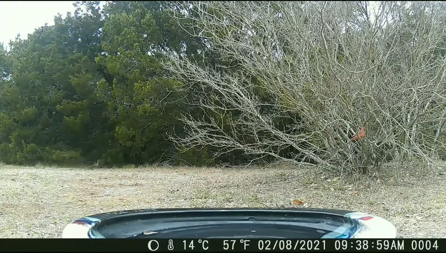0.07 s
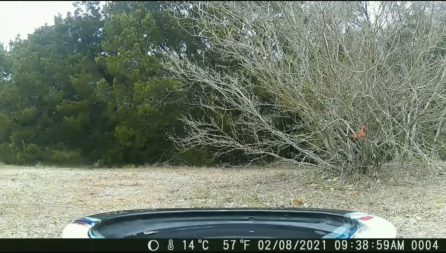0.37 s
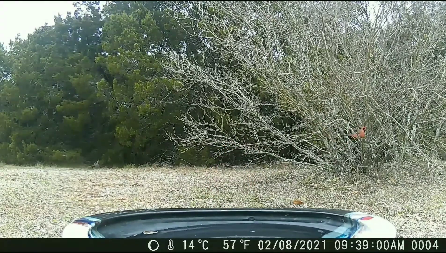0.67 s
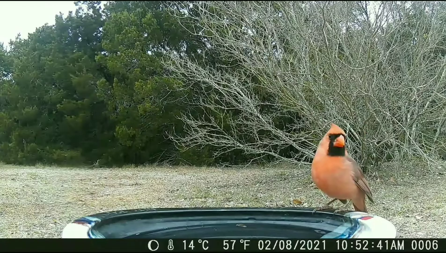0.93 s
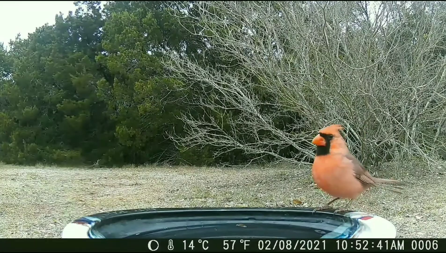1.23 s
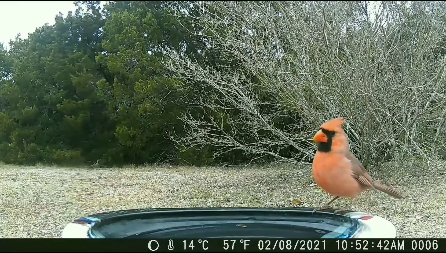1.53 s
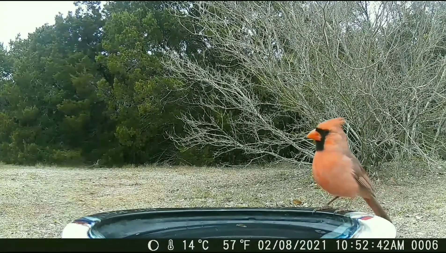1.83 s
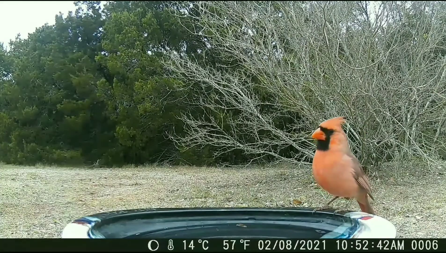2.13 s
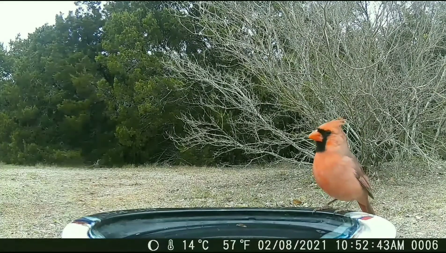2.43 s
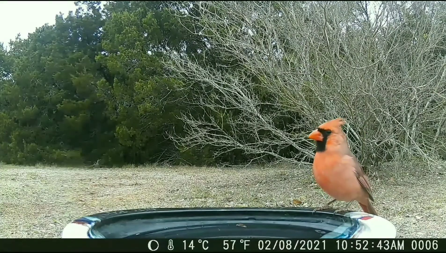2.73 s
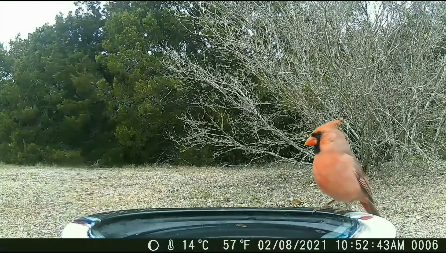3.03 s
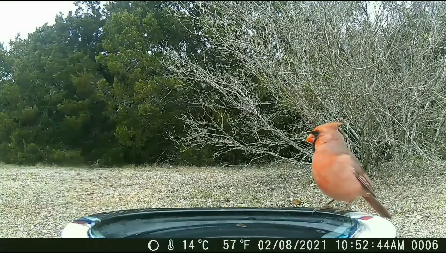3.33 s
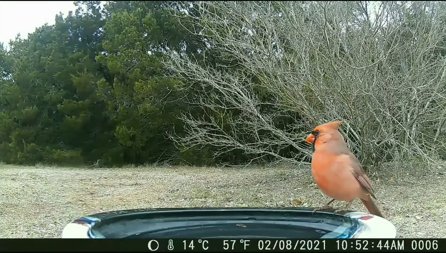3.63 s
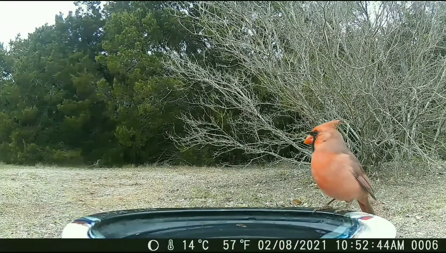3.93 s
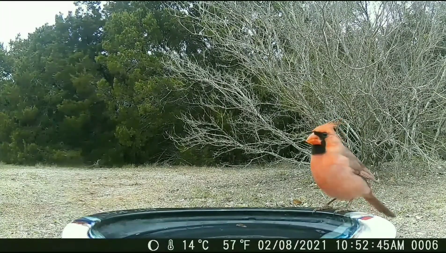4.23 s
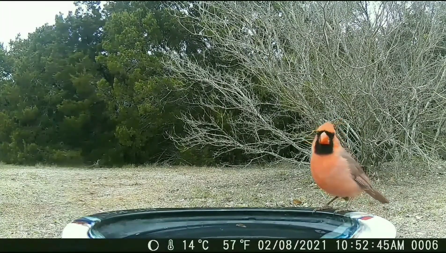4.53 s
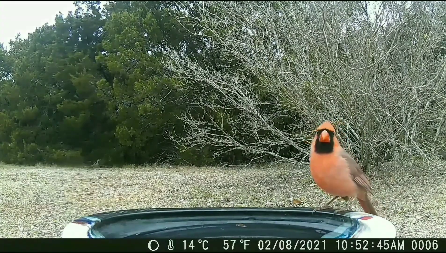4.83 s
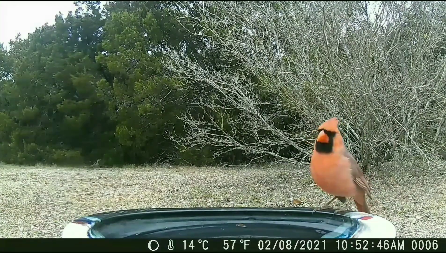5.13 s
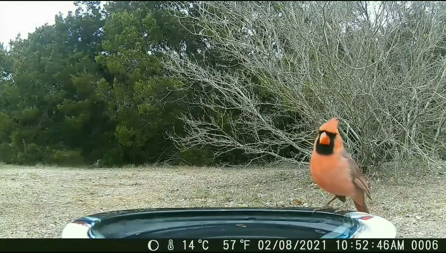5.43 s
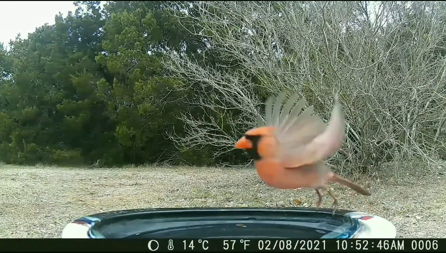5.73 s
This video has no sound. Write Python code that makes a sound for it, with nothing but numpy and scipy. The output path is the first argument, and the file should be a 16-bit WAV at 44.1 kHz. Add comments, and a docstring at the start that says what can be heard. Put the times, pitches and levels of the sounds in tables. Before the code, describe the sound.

A songbird whistles a run of seven upward-sweeping notes across a garden, with a few high chips near the microphone and light ticks on a hollow bird bath. Once the song stops, faint chirps and scratchy calls carry from the bushes, ending in a buzzy rising call and a faint thin whine. Soft wind and distant engines rumble underneath, and the small, slightly muffled microphone adds three electrical clicks.

```python
"""On a lawn, heard by a small camera on a bird bath, a cardinal sings seven rising whistles. Each is a gliding
tone, reflected by the ground and scattered by trees. Thin chips sound close by, other birds twitter in the
hedge, and light contacts excite the bath's damped resonances. Far engines drone in harmonics under soft wind,
and a thin whine swells at the end. The camera dulls the treble. The sound drops out briefly as the scene
changes, and three sharp clicks sound, one at the dropout."""
import sys
import numpy as np
from scipy import signal
from scipy.fft import rfft, irfft, next_fast_len
from scipy.io import wavfile
from scipy.ndimage import uniform_filter1d, map_coordinates

SR = 44100
rng = np.random.default_rng(int(sys.argv[2]) if len(sys.argv) > 2 else 0)


def generate_wav(sig):
    """Save sig (samples, or channels by samples) to the path in sys.argv[1] as 16-bit PCM at SR."""
    pcm = np.round(np.clip(np.atleast_2d(sig).T, -1, 1) * 32767).astype(np.int16)
    wavfile.write(sys.argv[1], SR, pcm)


N = 259749
TIME = np.arange(N) / SR

# one up-slurred whistle: (time from its knee [s], pitch [Hz], relative level [dB])
WHISTLE_CONTOUR = [(-.115, 1530, -23), (-.07, 1800, -18), (-.05, 1950, -14), (-.04, 2060, -4.5),
                   (-.02, 2280, -3), (-.002, 2460, -3), (.004, 2680, -1), (.01, 3130, 0), (.016, 3450, 0),
                   (.022, 3690, 0), (.027, 4000, -6), (.032, 4350, -22)]
# the cardinal's whistles: (time of the knee [s], level [dB], stretch of the slow rise [ratio])
WHISTLES = [(1.172, -61, 0.97), (1.498, -59, 0.98), (1.818, -60.5, 1.08), (2.132, -61, 1.0),
            (2.257, -61, .9), (2.570, -61, 0.95), (2.892, -62, 0.86)]
# the song's paths off the ground and nearby things: (delay [s], gain [dB])
REFLECTIONS = [(.00173, -15), (.01333, -5), (.01437, -10), (.01504, -12)]
# twigs scatter the high notes best: (frequency [Hz], gain [dB])
TWIG_SCATTER = [(1800, -1), (2900, -6), (3700, 2.5)]
# close chips: (time [s], length [s], first pitch [Hz], settled pitch [Hz], settling [s], base level [dB])
CHIPS = [(0.517, 0.024, 9360, 7630, 0.007, -58), (1.226, 0.029, 9870, 7670, 0.0088, -53),
         (2.836, 0.016, 9700, 8200, .005, -67.5), (3.362, .023, 9930, 8200, 0.0043, -43.5)]

# Each kind of hedge call has a shape, relative to its middle pitch, and a list of notes.
# shape: (first pitch [ratio], last pitch [ratio], rasp [ratio])
# notes: (time [s], length [s], middle pitch [Hz], level [dB])
SAG_SHAPE = (1.045, 0.93, .011)  # soft, low, drooping notes
SAG_NOTES = [(1.95, .045, 2130, -74), (3.182, 0.04, 1990, -72.5), (3.56, 0.036, 2080, -67),
             (3.634, .037, 1967, -68.5), (3.722, .042, 2100, -70), (3.795, 0.049, 2000, -73)]
FLICK_SHAPE = (.9, 1.075, .009)  # quick upward flicks
FLICK_NOTES = [(3.791, .055, 3090, -73.5), (5.146, .038, 3730, -65), (5.184, 0.025, 3640, -65.5),
               (5.548, 0.056, 3180, -75), (5.596, 0.034, 3835, -63)]
SCRATCH_SHAPE = (1.09, .93, .085)  # scratchy falling notes
SCRATCH_NOTES = [(3.446, 0.015, 3420, -69.5), (4.095, .042, 2600, -71), (4.123, .024, 3720, -68),
                 (4.14, 0.042, 3390, -71)]
ARCH_SHAPE = (.94, .81, 0.017)  # a run of arched chirps
ARCH_NOTES = [(4.749, 0.033, 2610, -70), (4.804, 0.036, 2644, -65.5), (4.867, 0.035, 2610, -67.5),
              (4.94, 0.035, 2460, -67)]
PIPE_SHAPE = (1.01, 0.97, .013)  # thin, almost level whistles
PIPE_NOTES = [(1.005, .05, 2056, -73.5), (2.638, .075, 2200, -71), (2.64, 0.047, 3690, -66.5),
              (3.125, 0.08, 3710, -77.5)]
HOARSE_SHAPE = (1.025, 1, .04)  # high, hoarse notes that sink a little
HOARSE_NOTES = [(3.459, .028, 3134, -64), (5.272, 0.057, 4320, -68), (5.32, .16, 4270, -72),
                (5.515, .03, 3480, -77), (5.627, .058, 3950, -68.5)]
# a long buzzy rising call: (time [s], pitch [Hz], level [dB])
LONG_CALL = [(5.70, 2050, -84), (5.765, 2330, -79), (5.799, 2850, -69.5), (5.823, 3000, -65),
             (5.843, 3234, -64), (5.89, 3380, -64.5)]

# light contacts on the bath: (time [s], level [dB], resonance [Hz])
BATH_TICKS = [(.05, -59.5, 2820), (.092, -61, 3050), (.161, -56.5, 990), (.172, -61, 1600),
              (.2502, -53, 1628), (.286, -55, 2870), (.294, -54.5, 2200), (.46, -54, 1048),
              (.47, -61, 3827), (.547, -52.5, 1330), (3.677, -55.5, 1998), (3.838, -66, 3400),
              (3.878, -61, 3300)]
# heavier contacts knock the hollow bowl: (time [s], level [dB], resonance [Hz])
BOWL_KNOCKS = [(.163, -51.5, 334), (.252, -57, 382), (.286, -49.5, 337), (1.474, -55.5, 420),
               (3.674, -52, 486)]

# harmonics of four far engines: (multiple of the base rate [ratio], level [dB])
MOTOR_PARTIALS = [(2, -65), (3, -76), (4, -78), (5, -75), (6, -77), (7, -85.5)]
THROB_PARTIALS = [(1, -50.5), (2, -53.5)]
SLOWING_PARTIALS = [(1, -50), (2, -61.5), (8, -79.5)]
IDLE_PARTIALS = [(1, -52.5), (2, -69), (6, -80)]
# the slowing engine's speed: (time [s], firing rate [Hz])
FIRING_RATE = [(1.0, 63), (2.5, 62), (3.5, 58.8), (4.4, 57.4), (5.89, 56.3)]
# the swell of its drone: (time [s], level [dB])
DRONE_LEVEL = [(1.0, -73), (3.0, -68.5), (3.8, -59.5), (4.5, -58.5), (5.1, -70.5), (5.89, -65.5)]
# the swell of the whine: (time [s], level [dB])
WHINE_LEVEL = [(5.15, -100), (5.32, -80.5), (5.5, -79), (5.63, -73.5), (5.89, -72)]

# puffs of wind on the microphone: (time of the peak [s], relative level [dB], half-width [s])
GUSTS = [(.2, -43.5, 0.15), (.37, -33.5, 0.035), (.48, -33.5, 0.051), (1.08, -37, 0.026),
         (1.181, -36, 0.018), (2.17, -37.5, 0.027), (4.115, -31, 0.048), (4.25, -35.5, 0.056),
         (4.49, -32, 0.081), (5.35, -40, 0.051), (5.56, -37, 0.042), (5.88, -36, 0.041)]
# spectrum of the eddies: (frequency [Hz], relative level [dB])
EDDY_SPECTRUM = [(10, 2), (25, 2), (38, 0.5), (55, -11.5), (110, -17), (250, -36), (800, -80)]
# outdoor air before and after the dropout: (frequency [Hz], spectral density [dB per Hz])
EARLY_AIR = [(15, -65), (60, -62), (110, -72.5), (200, -82), (300, -90), (500, -94.5), (800, -99),
             (1200, -101), (2000, -102), (3500, -105), (5000, -110), (8000, -113)]
LATE_AIR = [(15, -71), (60, -67), (110, -72), (160, -78), (300, -87.5), (450, -91.5), (800, -100),
            (1200, -104.5), (2000, -108), (3000, -112), (5000, -112), (8000, -114)]
# rise and fall of the air's treble: (time [s], gain [dB])
HISS_GAIN = [(0, 3), (.6, -1.5), (.95, -2.2), (1.2, 1.5), (2.9, .5), (3.9, 0), (4.6, -2), (5.1, 0),
             (5.89, 0)]

# the camera's response: (frequency [Hz], gain [dB])
CAMERA_RESPONSE = [(3550, -2), (3800, -10.5), (4000, -13.5), (4350, -20.5), (5500, -22), (6800, -16.5),
                   (7900, -16.5), (9200, -21), (10500, -26.5), (11800, -30), (12500, -25), (14000, -31.5),
                   (15400, -40), (15900, -61.5)]
# sharp clicks: (time [s], jump before smoothing [dB])
CLICKS = [(.961, -40.5), (2.218, -41), (5.0188, -36)]
CAMERA_RATE_HZ, CUTOFF_HZ = 16000, 15700
DROPOUT_START_S, DROPOUT_END_S = .961, 1.009


def cardinal(waver=0.0077, shimmer_db=1.0):
    """Frequency glide: each whistle swells on a slow rise, then whips upward, wavering at random."""
    out = np.zeros(N)
    from_knee, hz, db = np.transpose(WHISTLE_CONTOUR)
    for knee, level_db, stretch in WHISTLES:
        times = np.where(from_knee < 0, from_knee * stretch, from_knee)
        t = np.arange(times[0], times[-1], 1 / SR)
        pitch = np.interp(t, times, hz) * (1 + waver * drift(150, len(t)))
        loudness = level_db + np.interp(t, times, db) + shimmer_db * drift(120, len(t))
        add(out, knee + times[0], tone(pitch, loudness))
    return out


def chips(attack_s=0.0029, fade_db=22, accent_db=3.0):
    """Exponential relaxation: a chip starts abruptly and fades as its pitch settles downward."""
    out = np.zeros(N)
    for start, length, first_hz, settled_hz, settle_s, level_db in CHIPS:
        t = np.arange(0, length, 1 / SR)
        pitch = settled_hz + (first_hz - settled_hz) * np.exp(-t / settle_s)
        edges = np.clip(np.minimum(t, length - t) / attack_s, 0, 1)
        add(out, start, edges * tone(pitch, level_db + accent_db - fade_db * t / length))
    return out


def hedge_birds(rasp_hz=550, arch_power=.7):
    """Random frequency modulation: fast jitter widens short, curved glides into a rasp."""
    out = np.zeros(N)
    kinds = [(SAG_SHAPE, SAG_NOTES), (FLICK_SHAPE, FLICK_NOTES), (SCRATCH_SHAPE, SCRATCH_NOTES),
             (ARCH_SHAPE, ARCH_NOTES), (PIPE_SHAPE, PIPE_NOTES), (HOARSE_SHAPE, HOARSE_NOTES)]
    for (first, last, rasp), notes in kinds:
        bend = np.polyfit([0, .5, 1], [first, 1, last], 2)
        for start, length, hz, level_db in notes:
            t = np.arange(0, length, 1 / SR)
            glide = hz * np.polyval(bend, t / length)
            jitter = 1 + rasp * drift(rasp_hz, size=SR)[:len(t)]
            envelope = np.abs(np.sin(np.pi * t / length)) ** arch_power
            add(out, start, envelope * tone(glide * jitter, level_db))
    return out


def long_call(buzz_hz=165, depth=.07, jitter=.025):
    """Modulation sidebands: a fast, uneven vibrato makes a rising whistle buzz; one echo follows."""
    times, hz, db = np.transpose(LONG_CALL)
    vibrato = depth * np.sin(2 * np.pi * buzz_hz * TIME + drift(60)) + jitter * drift(400)
    pitch = np.interp(TIME, times, hz) * (1 + vibrato)
    call = tone(pitch, np.interp(TIME, times, db)) * (TIME > times[0])
    return call + echo(call, delay_s=.0085, level_db=-3.5)


def bird_bath(tick_decay_s=0.0038, tick_q=1.47, knock_decay_s=0.014, knock_q=2.5):
    """Damped resonance: each contact is a band of noise that dies away exponentially."""
    out, t = np.zeros(N), np.arange(SR // 10) / SR
    kinds = [(BATH_TICKS, tick_decay_s, tick_q), (BOWL_KNOCKS, knock_decay_s, knock_q)]
    for contacts, decay_s, q in kinds:
        fade = np.exp(-t / decay_s)
        for start, level_db, hz in contacts:
            b, a = signal.iirpeak(hz, q, fs=SR)
            noise = rng.standard_normal(2 * len(t))
            burst = fade * signal.lfilter(b, a, signal.lfilter(b, a, noise))[len(t):]
            add(out, start, from_db(level_db) * burst * np.linalg.norm(fade) / np.linalg.norm(burst))
    return out


def echo(x, delay_s, level_db):
    """Specular reflection: a longer path gives a delayed, weaker copy."""
    return from_db(level_db) * np.interp(TIME - delay_s, TIME, x, left=0)


def trees(x, level_db, t60=.55, edge_s=0.071, edge_width_s=0.02, edge_gain=1.1, far_db=-12, far_t60=1.6):
    """Diffuse scattering: branches give a tail, the wood's edge a swell, its depth a long faint ring."""
    t = np.arange(SR) / SR
    edge_swell = 1 + edge_gain * np.exp(-((t - edge_s) / edge_width_s) ** 2)
    near = from_db(-60 * t / t60) * edge_swell
    far = from_db(far_db - 60 * t / far_t60)
    tail = rng.standard_normal(SR) * np.hypot(near, far)
    return from_db(level_db) * signal.fftconvolve(x, tail / np.linalg.norm(tail))[:N]


def engine(hz, partials, wander, waver_db):
    """Periodic source: partials share one wandering rate, each wavering on its way through the air."""
    rate = hz * (1 + wander * drift(12))
    return sum(tone(multiple * rate, db + waver_db * drift(9)) for multiple, db in partials)


def early_engines(motor_hz=126.5, throb_hz=56.88):
    """Two harmonic series: a steady motor buzzes over a low throb."""
    motor = engine(motor_hz, MOTOR_PARTIALS, wander=.004, waver_db=2.1)
    throb = engine(throb_hz, THROB_PARTIALS, wander=.011, waver_db=3.0)
    return motor + throb


def late_engines(drone_ratio=3.6, idle_hz=86.52):
    """Pitch follows firing rate: one engine slows, its swelling drone in step, while another idles."""
    firing_hz = np.interp(TIME, *np.transpose(FIRING_RATE))
    drone_db = np.interp(TIME, *np.transpose(DRONE_LEVEL))
    slowing = engine(firing_hz, SLOWING_PARTIALS, wander=.014, waver_db=2.5)
    drone = engine(firing_hz, [(drone_ratio, drone_db)], wander=.006, waver_db=1.5)
    idling = engine(idle_hz, IDLE_PARTIALS, wander=.02, waver_db=3.5)
    return slowing + drone + idling


def whine(hz=1011.5, octave_db=-13):
    """Harmonic pair: a steady pitch and its faint octave swell together."""
    db = np.interp(TIME, *np.transpose(WHINE_LEVEL), left=-np.inf)
    pitch = np.full(N, hz)
    return tone(pitch, db) + tone(2 * pitch, db + octave_db)


def wind(gain_db=-1, steady_s=0.062, breeze_db=-56, restless_db=4):
    """Turbulence: eddies buffet the microphone in bell-shaped puffs over a restless breeze."""
    eddies = coloured(rng.standard_normal(N), EDDY_SPECTRUM)
    eddies /= np.sqrt(uniform_filter1d(eddies ** 2, int(steady_s * SR)))  # hold the rms near 1
    puffs = sum(from_db(db) * np.exp(-((TIME - peak) / width) ** 2) for peak, db, width in GUSTS)
    breeze = from_db(breeze_db + restless_db * drift(8))
    return eddies * from_db(gain_db) * np.hypot(puffs, breeze)


def air(spectrum, hiss_band_hz=(1900, 4500)):
    """Broadband noise: outdoor rumble and slowly varying hiss, below the camera's Nyquist limit."""
    white = rng.standard_normal(N) * np.sqrt(SR / 2)  # unit power per Hz
    camera_band = signal.butter(12, CAMERA_RATE_HZ / 2, fs=SR, output="sos")
    noise = signal.sosfilt(camera_band, coloured(white, spectrum))
    hiss = signal.sosfiltfilt(signal.butter(2, hiss_band_hz, "band", fs=SR, output="sos"), noise)
    hiss_gain = from_db(np.interp(TIME, *np.transpose(HISS_GAIN)))
    return noise + hiss * (hiss_gain - 1)


def clicks(relax_s=0.0017, edge_hz=7000):
    """Sharp clicks: the signal jumps and relaxes exponentially."""
    out, t = np.zeros(N), np.arange(SR // 20) / SR
    for start, jump_db in CLICKS:
        add(out, start, -from_db(jump_db) * np.exp(-t / relax_s))
    return signal.sosfilt(signal.butter(1, edge_hz, fs=SR, output="sos"), out + 1e-18)


def from_db(db):
    """Logarithmic level: 20 dB is a tenfold amplitude."""
    return 10 ** (np.asarray(db) / 20)


def coloured(x, spectrum):
    """Linear filtering: (frequency [Hz], gain [dB]) points, joined on a log axis, shape the spectrum."""
    hz, db = np.transpose(spectrum)
    size = next_fast_len(len(x) + SR // 10)
    bins = np.maximum(np.fft.rfftfreq(size, 1 / SR), 1)
    gain = from_db(np.interp(np.log(bins), np.log(hz), db))
    return irfft(rfft(x, size) * gain, size)[:len(x)]


def drift(rate, size=N):
    """Smooth random fluctuation of spread near 1, changing about rate times a second."""
    knots = rng.standard_normal(size // 10)
    return map_coordinates(knots, [TIME[:size] * rate], order=3, mode="wrap")


def tone(hz, db):
    """Phase is the integral of frequency: a sine follows a pitch curve at an rms level."""
    return np.sqrt(2) * from_db(db) * np.sin(2 * np.pi * np.cumsum(hz) / SR)


def add(out, start_s, sound):
    """Superposition: a sound joins the mix at its start time."""
    at = max(round(start_s * SR), 0)
    out[at:at + len(sound)] += sound[:max(N - at, 0)]


def scene():
    """Superposition: direct, reflected and scattered birdsong sums with the bath and the background."""
    song, near, far = cardinal(), chips(), hedge_birds() + long_call()
    reflected = sum(echo(song, *path) for path in REFLECTIONS)
    song = song + reflected + trees(coloured(song, TWIG_SCATTER), level_db=-3)
    near = near + trees(near, level_db=-22)
    far = far + trees(coloured(far, TWIG_SCATTER), level_db=-7)
    early = air(EARLY_AIR) + early_engines()
    late = air(LATE_AIR) + late_engines()
    background = np.where(TIME < DROPOUT_END_S, early, late) + whine() + wind()
    return (song + near + far + bird_bath() + background)[None]


def record(dry, dropout_db=-38, close_samples=20, reopen_s=0.0092):
    """Imaging: a low sampling rate mirrors sound into the treble; the camera dulls it; the sound cuts out
    briefly as the scene changes, and clicks."""
    mirrored = dry[0] * (1 + 2 * np.cos(2 * np.pi * CAMERA_RATE_HZ * TIME))
    closing = np.clip((DROPOUT_START_S - TIME) * SR / close_samples, 0, 1)
    opening = np.clip((TIME - DROPOUT_END_S) / reopen_s, 0, 1)
    gate = np.maximum(closing + opening, from_db(dropout_db))
    sound = coloured(mirrored, CAMERA_RESPONSE) * gate + clicks()
    lowpass = signal.ellip(10, .1, 80, CUTOFF_HZ, fs=SR, output="sos")
    return signal.sosfilt(lowpass, sound)[None]


dry = scene()
out = record(dry)
generate_wav(out)
```